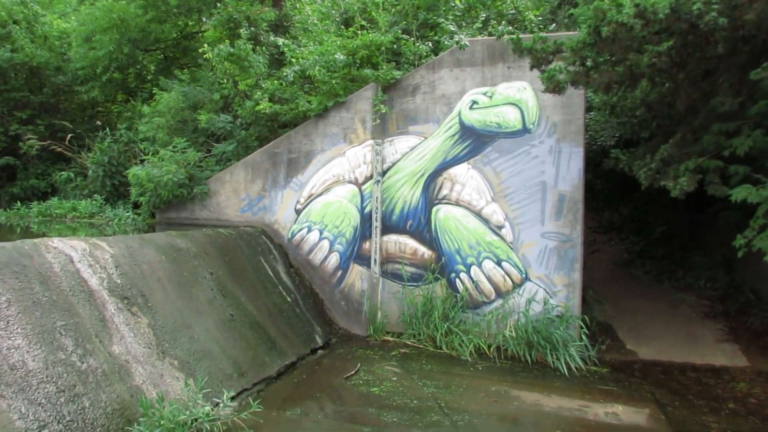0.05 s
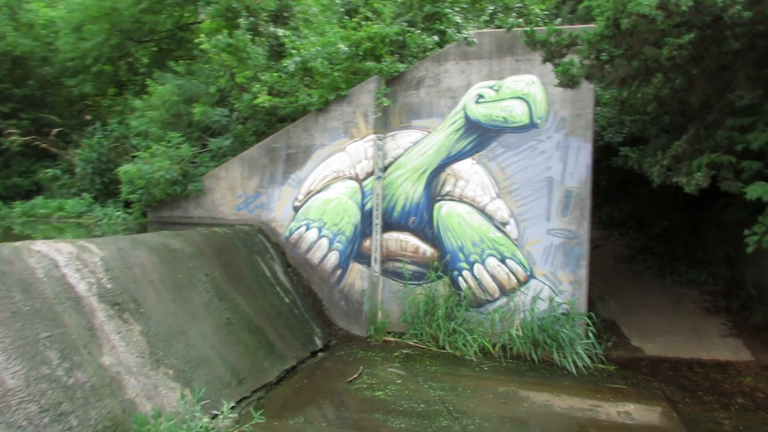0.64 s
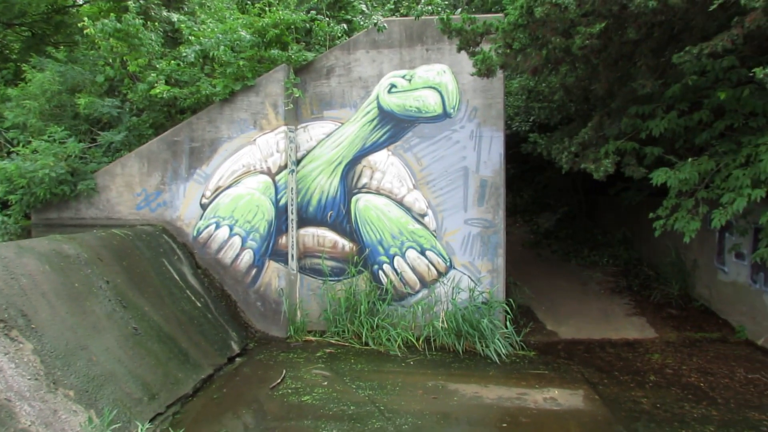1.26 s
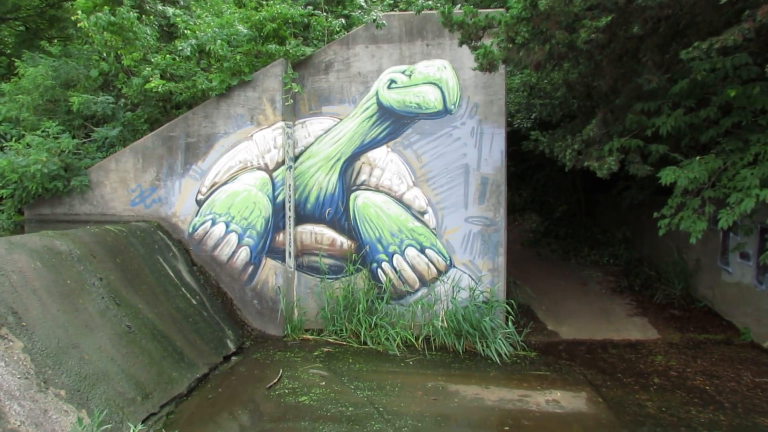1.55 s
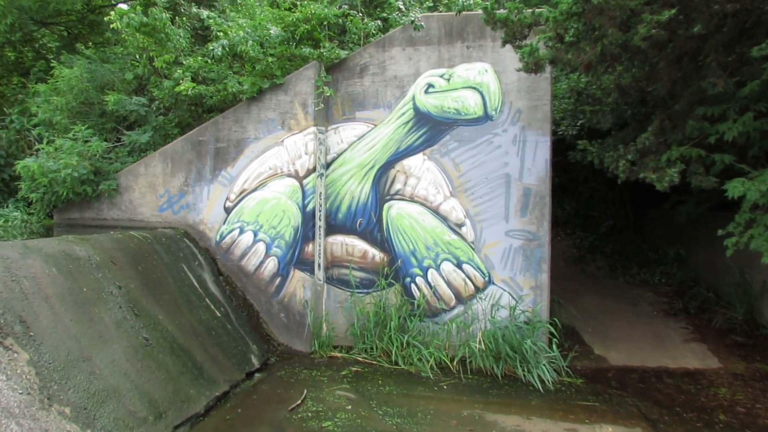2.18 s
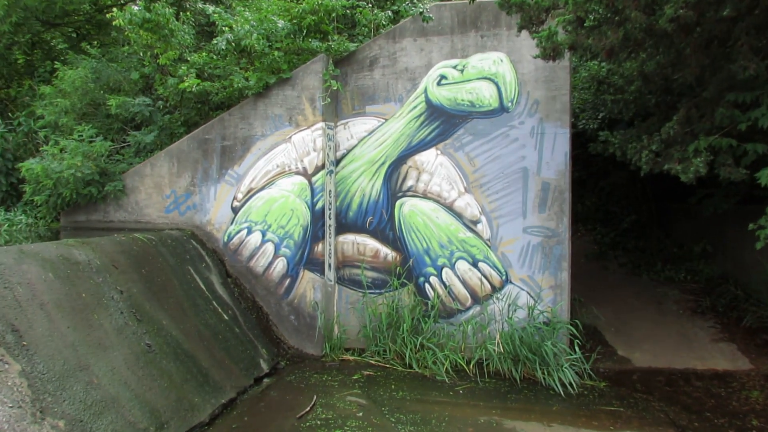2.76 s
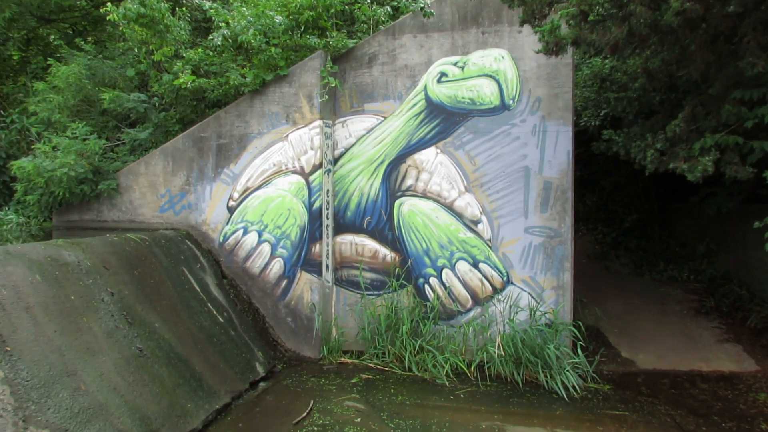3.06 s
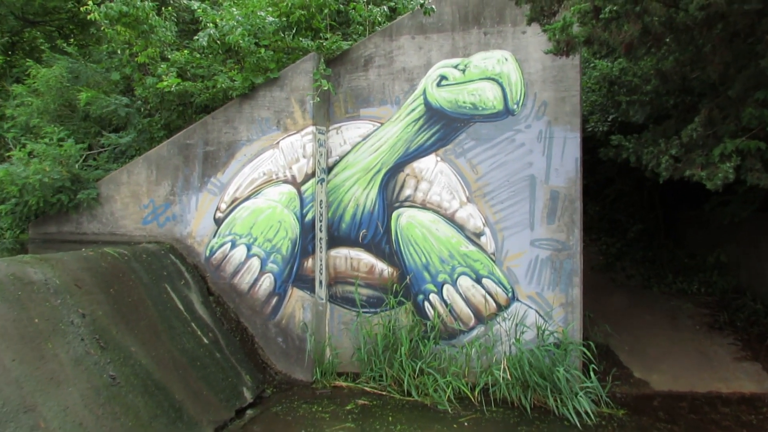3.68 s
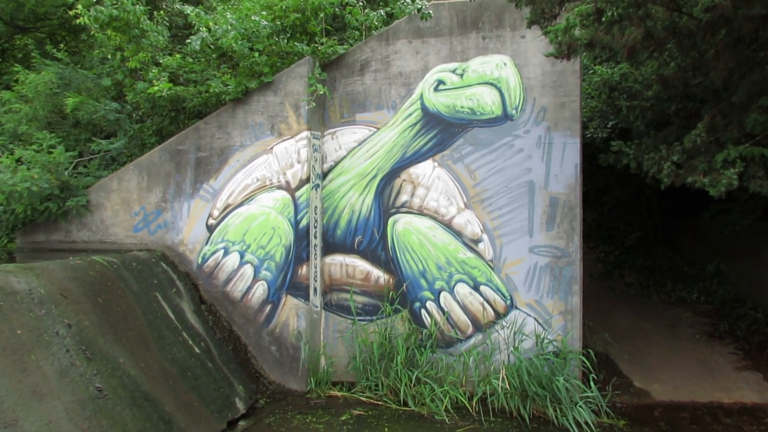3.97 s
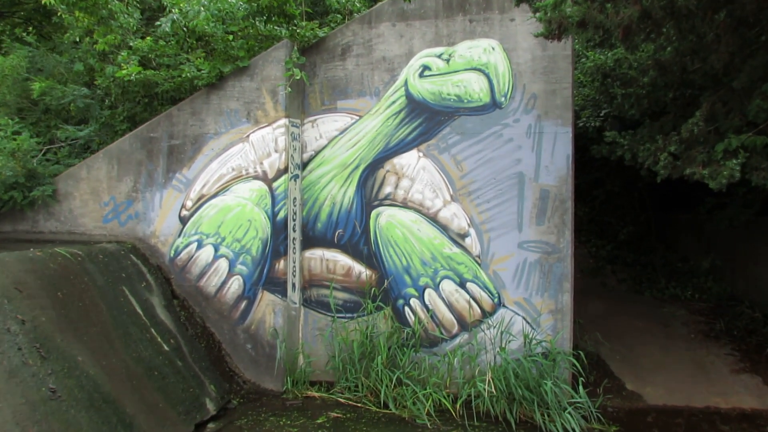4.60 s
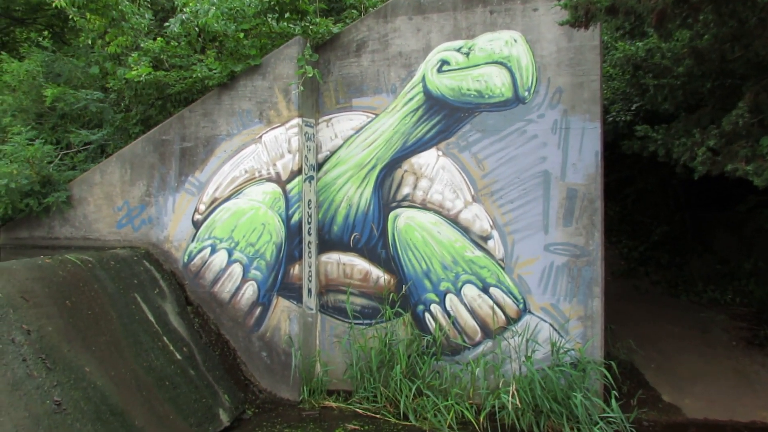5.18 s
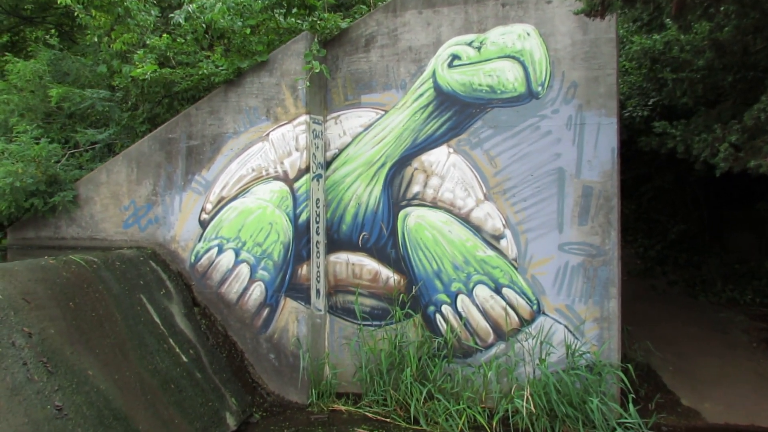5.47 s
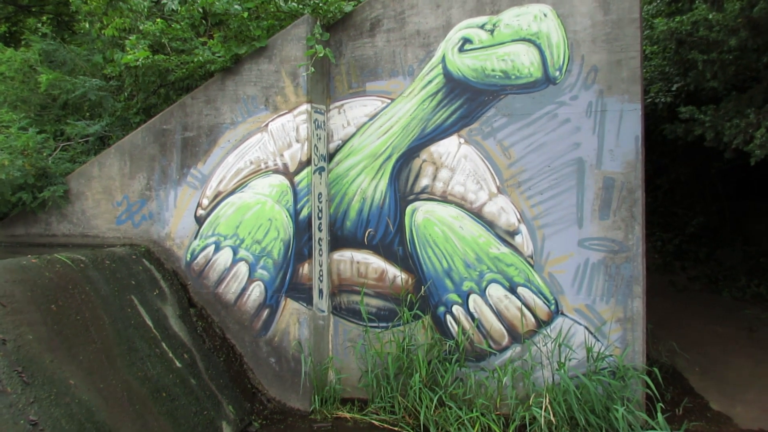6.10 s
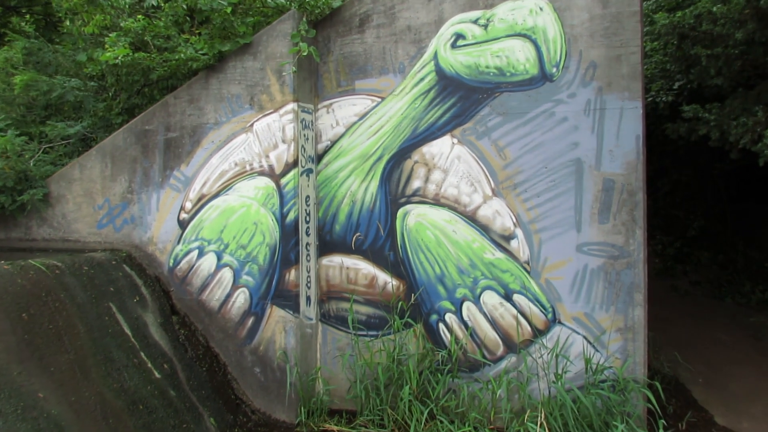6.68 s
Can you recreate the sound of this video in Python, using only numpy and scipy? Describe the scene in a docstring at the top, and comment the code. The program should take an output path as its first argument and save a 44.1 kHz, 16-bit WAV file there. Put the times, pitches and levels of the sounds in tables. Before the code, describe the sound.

Shallow water washes gently along a concrete channel while a small frog calls without pause, near the microphone and to the right. Its rapid, dry clicks gradually spread out and fill into brief rattles, each with a slight echo. Much quieter are a thin bird whistle at the start, a few plopping drops, soft rustles on the left, distant frogs and a low, far-off motor hum.

```python
"""A shallow concrete creek: close on the right a small frog clicks, quick double ticks slowing into rattles.
Each snap of its larynx excites the resonances of its vocal sac; the banks and a culvert reflect the sound.
Water runs and gurgles, more frogs call far off, a few drops plop as their trapped bubbles ring,
something rustles on the left, a bird whistles once and a distant motor hums."""
import sys
import numpy as np
from scipy import signal
from scipy.fft import rfft, irfft
from scipy.io import wavfile
from scipy.ndimage import uniform_filter1d

SR = 44100
rng = np.random.default_rng(int(sys.argv[2]) if len(sys.argv) > 2 else 0)


def log_audio(samples):
    """Write samples as a 16-bit WAV file to the path given in sys.argv[1]."""
    # one column per channel
    frames = np.atleast_2d(samples).T
    # limit to full scale, then quantise
    limited = np.clip(frames, -1, 1)
    pcm = np.round(limited * 32767).astype(np.int16)
    wavfile.write(sys.argv[1], SR, pcm)


N = 302085

# the frog's voice: (time [s], sac pitch [Hz], fullness [0 = dry tick, 1 = full rattle],
# relative level of the opening note [dB], gain of the path to the left [dB])
VOICE = [(0, 3370, 0.064, -11, -3), (1.2, 3312, 0, -10, 0), (2.098, 3370, .18, -10.5, -1.5),
         (2.899, 3347, .5, -12, -0.5), (3.501, 3304, 1, -13, -1.5), (4.6, 3303, 1, -14.5, 1.5),
         (5.3, 3357, 0.98, -14.5, 2), (6.1, 3201, 0.95, -14.5, 1.5), (6.8, 3223, 0.97, -15, 2)]


def frog(stretch=0.013, relax_s=0.032, pitch_jitter=.017, jitter_s=.0001, jitter_db=.6):
    """Tension raises a resonance: each click stretches the sac, so the pitch climbs through a rattle."""
    # calls: (start [s], relative level of the middle and closing notes [dB], delay of the repeated
    # opening [ms], of the middle note [ms], of the closing note [ms], closing clicks [count]); 0 = absent
    croaks = [(0.0333, -10, 0, 40.4, 0, 0), (0.154, -7.6, 0, 31.2, 0, 0), (0.2706, -9, 0, 30.8, 0, 0),
              (0.3807, -8.3, 0, 28.3, 0, 0), (0.4907, -12.4, 0, 36.5, 0, 0), (0.6051, -9.2, 0, 27.1, 0, 0),
              (0.7111, -12, 0, 46.5, 0, 0), (0.8364, -11.8, 0, 38.5, 0, 0), (0.9529, -9.6, 0, 37.1, 0, 0),
              (1.0677, -9.6, 0, 28.8, 0, 0), (1.1747, -8.9, 0, 25.4, 32.5, 2),
              (1.2853, -9.5, 0, 30.3, 0, 0), (1.3962, -9.3, 0, 21.1, 46, 2), (1.5213, -7.1, 0, 24.6, 0, 0),
              (1.6329, -9.9, 0, 29.4, 0, 0), (1.7417, -11.4, 0, 35.2, 58.8, 2),
              (1.8813, -11.4, 0, 34.9, 0, 0), (1.9911, -9.3, 14.1, 38.1, 67, 2),
              (2.147, -11, 0, 34.4, 39.5, 2), (2.2601, -10.4, 17.2, 50.5, 59, 3),
              (2.4186, -9.4, 13.5, 39.3, 64.7, 3), (2.599, -7.7, 10.7, 36.8, 73.8, 2),
              (2.7738, -8.7, 10.8, 37.1, 56.9, 4), (2.9576, -6.2, 13.6, 38.5, 72.7, 5),
              (3.201, -7.6, 9.9, 35.2, 58.5, 6), (3.4759, -8.2, 10.1, 35, 58.2, 5),
              (3.7974, -7.7, 14.1, 36.4, 58.7, 6), (4.1569, -9.8, 0, 27.4, 63.1, 9),
              (4.5234, -9.8, 0, 23.8, 56.1, 7), (4.845, -9.4, 9, 32.9, 53.5, 4),
              (5.1361, -10.2, 9.4, 33.1, 53.5, 5), (5.4445, -11.2, 9, 34.2, 53.5, 5),
              (5.7592, -11.9, 11.6, 37, 58.8, 6), (6.083, -11.8, 11.8, 36.7, 59.5, 6),
              (6.3957, -11.3, 10.1, 33.7, 56.3, 5), (6.699, -11.6, 13.6, 35.1, 60, 4)]
    clicks = np.array(sorted(c for row in croaks for c in call(*row)))
    times, pitch_hz, fullness, *_ = np.transpose(VOICE)
    out, tension, last = np.zeros(N), 0, 0
    for (s, db), (sharp, late, hard) in zip(clicks, rng.standard_normal((len(clicks), 3))):
        tension *= np.exp(-abs(s - last) / relax_s)
        hz = np.interp(s, times, pitch_hz) * (1 + stretch * tension + pitch_jitter * sharp)
        gain = undb(min(db + jitter_db * hard, -8) + 0.22)  # the hardest clicks are capped
        add(out, s + jitter_s * late, gain * click(hz, np.interp(s, times, fullness)))
        tension, last = tension + 1, s
    return out


def call(s, db, repeat_ms, middle_ms, closing_ms, closing_clicks, opening_clicks=2, break_s=.0035):
    """Pulse trains in sequence, each cut off by the next: a call's clicks as (time [s], level [dB])."""
    # each note as dry tick, then as full rattle: (click spacing [ms], fade per click [dB])
    opening = [(6.0, 6.5), (4.8, 5.5)]
    middle = [(4.0, 4.5), (5.7, 1.7)]
    closing = [(4.8, 3.1), (5.8, 0.97)]
    times, _, fullness, opening_db, _ = np.transpose(VOICE)
    full, soft_db = np.interp(s, times, fullness), np.interp(s, times, opening_db)
    middle_clicks = np.interp(full, [0, 1], [2.6, 4.2])
    clicks = note(opening, s, soft_db, full, opening_clicks)
    later = [(opening, repeat_ms, soft_db, opening_clicks),
             (middle, middle_ms, db, middle_clicks),
             (closing, closing_ms, db, closing_clicks)]
    for shape, ms, note_db, count in later:
        if ms > 0:
            start = s + ms / 1000
            clicks = [c for c in clicks if c[0] < start - break_s]
            clicks += note(shape, start, note_db, full, count)
    return clicks


def note(shape, s, db, fullness, count):
    """A decaying pulse train as (time [s], level [dB]); a fuller voice decays more slowly."""
    tick, rattle = np.array(shape)
    spacing_ms, fade_db = tick + np.clip(fullness, 0, 1) * (rattle - tick)
    return [(s + k * spacing_ms / 1000, db - k * fade_db) for k in range(int(round(count)))]


def click(pitch_hz, fullness, sac_hz=3370, size=1024):
    """Impulse excitation: a snap of the larynx rings the vocal sac; in dry ticks two resonances beat."""
    # sac response at pitch sac_hz: (frequency [Hz], dry tick gain [dB], full rattle gain [dB])
    sac = [(1000, -53, -81), (2030, -32, -29), (2447, -22.5, -24), (2799, 5, -8.5), (2590, -1, -3.5),
           (3030, 0.5, -3.5), (3547, 1.5, 4.5), (3663, 7.5, -1.5), (3823, -0.5, -15), (4160, -20.5, -26),
           (4570, -13, -25), (5020, -53, -41), (9500, -69, -72)]
    tick_db, full_db = spectra(sac, np.fft.rfftfreq(size, 1 / SR) * sac_hz / pitch_hz)
    return ring(tick_db + np.clip(fullness, 0, 1) * (full_db - tick_db))


def ring(db, size=1024):
    """Minimum-phase impulse response of a resonator with this gain curve, peak 1."""
    cepstrum = irfft(np.log(undb(db)))
    cepstrum[1:size // 2] *= 2  # folding the cepstrum makes the ring causal
    cepstrum[size // 2 + 1:] = 0
    x = irfft(np.exp(rfft(cepstrum)))
    return x / np.abs(x).max()


def overtones(voice, level_db=-22.5, linger_s=0.0086):
    """Scattering by the banks turns the frog's treble into a sizzle that lingers after each click."""
    # overtone spectrum: (frequency [Hz], dry tick level [dB], full rattle level [dB])
    colour = [(3000, -19.5, -15.5), (4250, -8, -9), (4530, 5, 6), (5190, 0.5, 7), (5760, -4, -2),
              (6400, -4.5, -6), (7780, -11, -15.5), (11300, -41, -21), (13400, -16, -13), (14800, -51, -45)]
    keep = np.exp(-1 / (linger_s * SR))
    power = signal.lfilter([1 - keep], [1, -keep], voice ** 2)
    fullness = np.clip(curves(VOICE)[1], 0, 1)
    tick, rattle = (np.array([unit(hiss(colour, column)) for _ in range(2)]) for column in range(2))
    sizzle = tick * np.sqrt(1 - fullness) + rattle * np.sqrt(fullness)
    return pan(sizzle * np.sqrt(power), -2.0) * undb(level_db)


def shadow(voice):
    """Acoustic shadow: the left side, turned away from the frog, gets a thinner sound."""
    # colour on the shaded side: (frequency [Hz], gain [dB])
    shade = [(2700, -2.5), (3300, 4), (3750, 3.5)]
    shade_db, = spectra(shade, np.fft.rfftfreq(N, 1 / SR))
    *_, left_db = curves(VOICE)
    return irfft(rfft(voice) * undb(shade_db), N) * undb(left_db)


def creek(x, channel, direct_db, lag_ms, near_db, far_db, patterns=8):
    """Multipath propagation: direct sound plus echoes whose pattern changes as the listener sways."""
    out = np.zeros(N)
    add(out, lag_ms / 1000, undb(direct_db) * x)
    for part in np.array_split(np.arange(N), patterns):
        add(out, part[0] / SR, signal.fftconvolve(x[part], banks(channel, near_db, far_db)))
    return out


def banks(channel, near_db, far_db, near_t60=0.19, far_t60=0.86):
    """Reflection off concrete: an impulse response of early scatter, smeared echoes and a faint tail."""
    # echoes from banks and culvert: (delay [ms], smear [ms], left gain [dB], right gain [dB])
    echoes = [(1.1, 1.2, -20, -26), (7.5, 3, -26, -23), (14, .5, -28, -16), (19, 2, -27, -21),
              (38, 5, -28, -20), (75.5, 1.5, -27, -17.5), (228, 4, -26, -17.5)]
    response = np.zeros(SR)
    add(response, 0.003, undb(near_db) * scatter(near_t60 / np.log(1000)))
    # far paths lose the edges of the call's spectrum
    add(response, 0.045, undb(far_db) * band(scatter(far_t60 / np.log(1000)), 2240, 5800))
    for delay_ms, smear_ms, *db in echoes:
        echo = undb(db[channel]) * scatter(smear_ms / 1000)
        add(response, delay_ms / 1000, band(echo, 2630, 3520) if delay_ms > 60 else echo)
    return response


def scatter(decay_s):
    """Diffuse reflection: decaying noise with unit gain in the frog's band, 2800-3800 Hz."""
    t = np.arange(int(np.clip(10 * decay_s * SR, SR // 20, SR))) / SR
    tail = rng.standard_normal(len(t)) * np.exp(-t / decay_s)
    return tail / np.sqrt(np.mean(np.abs(rfft(tail, SR)[2800:3800]) ** 2))


def water(flicker_db=1.0):
    """Broadband flow noise: a shallow stream's wide wash, whose octaves flicker independently."""
    # running water, mid signal: (frequency [Hz], spectral density [dB per Hz])
    wash = [(30, -120), (60, -109), (100, -96), (190, -91), (260, -83.5), (550, -83), (800, -80.5),
            (1000, -84.5), (1250, -84), (1700, -87.5), (4500, -90), (8000, -99), (10000, -105),
            (15500, -113)]
    # its spread: (frequency [Hz], side minus mid [dB], left minus right [dB])
    width = [(100, -5, 5), (302, -2.5, 4), (1250, -2.5, -0.7), (4000, 0, 0), (10000, -22, 1)]
    hz = np.fft.rfftfreq(N, 1 / SR)
    side_db, left_db = spectra(width, hz)
    mid, side = rfft(hiss(wash)), rfft(hiss(wash)) * undb(side_db)
    both = np.array([(mid + side) * undb(left_db / 2), (mid - side) * undb(-left_db / 2)])
    octave = np.floor(np.log2(np.maximum(hz, 200)))
    return sum(irfft(both * (octave == k), N) * undb(flicker_db * walk(22)) for k in np.unique(octave))


def gurgle(peak_s=2.36, width_s=0.087, level_db=-50.5):
    """Low-band flow noise swells as the water churns for a moment."""
    churn = unit(band(rng.standard_normal(N), 200, 450))
    return pan(churn * undb(level_db) * swell(peak_s, width_s, width_s), 2)


def far_frogs(level_db=-53, waver_db=1.0, band_hz=(3050, 3740)):
    """Incoherent summation: the clicks of frogs down the creek merge into a wavering band of noise."""
    sides = [unit(band(band(rng.standard_normal(N), *band_hz), *band_hz)) for _ in range(2)]
    return pan(np.array(sides), -19.0) * undb(level_db + waver_db * np.tanh(walk(14)))


def drops(glide=2.0, onset_s=0.00039, splash_db=-11, splash_s=0.0024):
    """Bubble resonance: each drop slaps the surface and traps air that rings and rises in pitch."""
    # drops on the water: (time [s], starting pitch [Hz], level [dB], time to fade by 60 dB [s])
    impacts = [(1.756, 1080, -31, 0.027), (1.757, 1650, -34, 0.017), (1.824, 1156, -25, 0.026),
               (1.88, 1830, -32.5, 0.017)]
    out, t = np.zeros(N), np.arange(SR // 10) / SR
    for s, hz, db, t60 in impacts:
        bubble = np.exp(-np.log(1000) * t / t60) * np.sin(2 * np.pi * hz * t * (1 + glide * t))
        slap = unit(band(rng.standard_normal(len(t)), hz * .75, hz * 1.28)) * np.exp(-t / splash_s)
        add(out, s, undb(db) * (1 - np.exp(-t / onset_s)) * (bubble + undb(splash_db) * slap))
    return pan(out, 7.3)


def rustle(grain_db=4.5, crackle_db=2.0, gain_db=9.0):
    """Friction noise: soft, crackly brushes of rubbing close on the left."""
    # spectrum of the rubbing: (frequency [Hz], relative level [dB])
    colour = [(1000, -13), (3000, -3), (6000, -0.5), (9000, -5), (13000, -9.5), (16000, -19)]
    # brushes: (peak time [s], rise [s], fall [s], relative level [dB])
    strokes = [(1.235, 0.033, 0.1, -55.5), (1.42, 0.011, 0.11, -59.5), (1.555, 0.015, 0.023, -57),
               (1.775, 0.06, 0.041, -57.5), (2.56, 0.14, 0.16, -56), (4.28, 0.049, 0.089, -62.5)]
    # faint hiss between them: (time [s], relative level [dB])
    faint_hiss = [(0, -67.5), (3.1, -71), (4.2, -80), (6.85, -79)]
    faint_db, = curves(faint_hiss)
    brushes = np.sqrt(sum((undb(db) * swell(s, rise, fall)) ** 2 for s, rise, fall, db in strokes))
    grains = np.repeat(rng.exponential(size=N // 40 + 1), 40)[:N]
    crackle = unit(undb(crackle_db * np.minimum(grains, 5)))
    envelope = np.hypot(undb(faint_db + grain_db * walk(300)), brushes * crackle)
    rub = np.array([unit(hiss(colour)) for _ in range(2)]) * envelope
    return pan(rub, 2.7) * undb(gain_db)


def dry_ticks(decay_s=0.001):
    """Transients in the rustle: bright noise bursts with a fast exponential decay."""
    # small ticks: (time [s], level before the band-pass [dB])
    ticks = [(1.316, -32), (4.2933, -29.5), (5.483, -34)]
    out, t = np.zeros(N), np.arange(SR // 20) / SR
    for s, db in ticks:
        add(out, s, undb(db) * rng.standard_normal(len(t)) * np.exp(-t / decay_s))
    return pan(band(out, 3500, 10200), 2)


def bird(taper=0.35):
    """Frequency-swept pure tones: a thin upward whistle and a soft after-note."""
    # whistles: (start [s], length [s], first pitch [Hz], last pitch [Hz], level [dB])
    whistles = [(0.122, .066, 1980, 3150, -44), (0.306, .035, 2060, 1860, -50)]
    out = np.zeros(N)
    for s, length, first_hz, last_hz, db in whistles:
        hz = np.linspace(first_hz, last_hz, int(length * SR))
        tone = np.sin(2 * np.pi * np.cumsum(hz) / SR)
        add(out, s, undb(db) * signal.windows.tukey(len(hz), taper) * tone)
    return pan(out, 1.9)


def motor(hz=80.8, waver=0.0016, waver_db=1.0):
    """A harmonic series: a far motor's hum, each harmonic fading in and out on its way."""
    # course of the hum: (time [s], level [dB], spectral tilt [dB per harmonic])
    course = [(0, -66.5, -3.5), (1, -66, -0.5), (3, -69, 0.5), (4.7, -70, -1.5), (4.9, -66.5, 4),
              (5.3, -63, -2), (5.52, -56.5, 0), (5.72, -65, -1), (6, -56, 0.8), (6.3, -62, -2.5),
              (6.85, -67.5, 0)]
    # harmonics: (order [multiple of hz], relative level [dB])
    orders = [(1, -15), (2, -14.5), (3, -1), (4, -2), (5, -0.5)]
    db, tilt_db = curves(course)
    phase = 2 * np.pi * np.cumsum(hz * (1 + waver * walk(6))) / SR
    pivot = np.mean(orders, axis=0)[0]
    hum = sum(undb(order_db + tilt_db * (k - pivot) + waver_db * walk(5.0)) * np.sin(round(k) * phase)
              for k, order_db in orders)
    return pan(np.sqrt(2) * hum * undb(db), 4.0)


def undb(db):
    """Decibels to amplitude gain."""
    return 10 ** (np.asarray(db) / 20)


def unit(x):
    """Scale to rms 1."""
    return x / np.sqrt(np.mean(x ** 2))


def curves(table):
    """The columns of a timed table, interpolated sample by sample."""
    s, *columns = np.transpose(table)
    return [np.interp(np.arange(N) / SR, s, c) for c in columns]


def spectra(table, hz):
    """The columns of a frequency table, interpolated on a log axis."""
    f, *columns = np.transpose(table)
    return [np.interp(np.log(hz + 1), np.log(f), c) for c in columns]


def hiss(table, column=0):
    """Noise with the given spectral density [dB per Hz]."""
    db = spectra(table, np.fft.rfftfreq(N, 1 / SR))[column]
    return irfft(rfft(rng.standard_normal(N)) * undb(db), N) * np.sqrt(SR / 2)


def band(x, low_hz, high_hz):
    """Band-pass filter."""
    sos = signal.butter(2, [low_hz, high_hz], "band", fs=SR, output="sos")
    return signal.sosfilt(sos, x + 1e-18)


def walk(rate_hz):
    """Smooth random fluctuation with rms 1."""
    hold = int(SR / rate_hz)
    steps = np.repeat(rng.standard_normal(N // hold + 1), hold)
    return unit(uniform_filter1d(steps, hold)[:N])


def swell(peak_s, rise_s, fall_s):
    """A bell-shaped envelope with peak 1."""
    t = np.arange(N) / SR - peak_s
    return np.exp(-(t / np.where(t < 0, rise_s, fall_s)) ** 2)


def pan(x, left_db):
    """Place a sound by its level difference, left minus right."""
    return x * undb(np.array([[left_db], [-left_db]]) / 2)


def add(out, s, x):
    """Mix x into out from time s."""
    i = int(np.clip(s * SR, 0, len(out)))
    out[i:i + len(x)] += x[:len(out) - i]


def scene():
    """Superposition: the frog, louder and earlier on the right, over the sounds of the creek."""
    voice = frog()
    left = creek(shadow(voice), channel=0, direct_db=-16, lag_ms=.23, near_db=-19.5, far_db=-25.5)
    right = creek(voice, channel=1, direct_db=0, lag_ms=0, near_db=-14.5, far_db=-21.5)
    near_frog = np.array([left, right]) + overtones(voice)
    return (near_frog + far_frogs() + water() + gurgle() + drops()
            + rustle() + dry_ticks() + bird() + motor())


def record(dry, top_hz=15900):
    """Band limiting: a steep low-pass filter cuts the highest treble."""
    return signal.sosfilt(signal.ellip(10, .2, 70, top_hz, fs=SR, output="sos"), dry)


dry = scene()
out = record(dry)
log_audio(out)
```